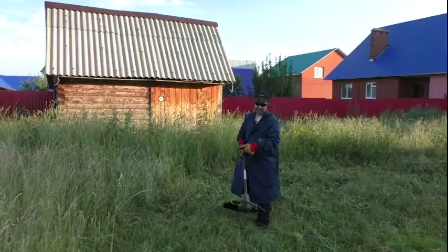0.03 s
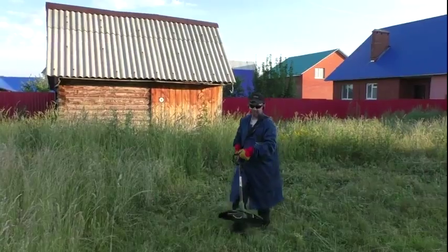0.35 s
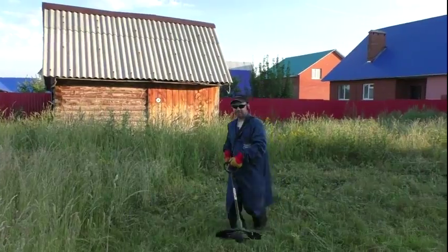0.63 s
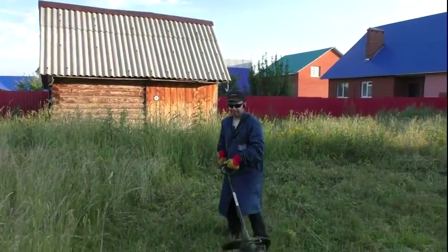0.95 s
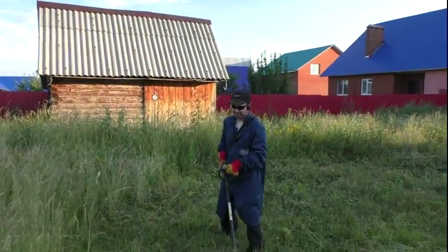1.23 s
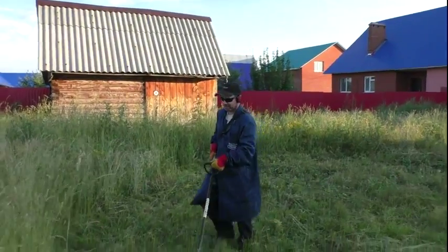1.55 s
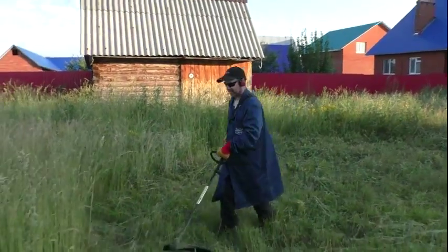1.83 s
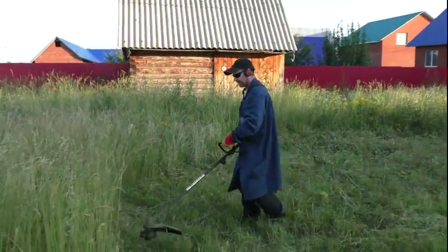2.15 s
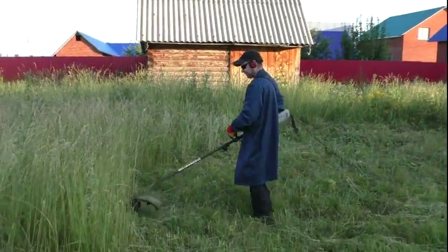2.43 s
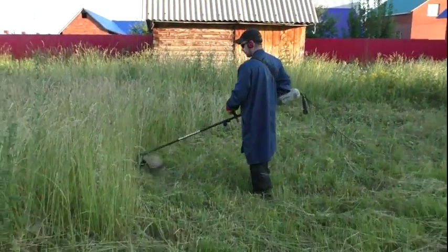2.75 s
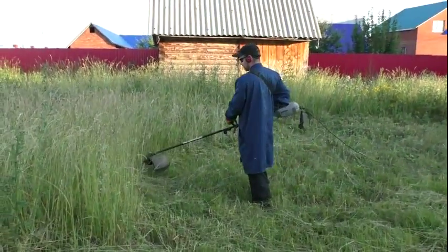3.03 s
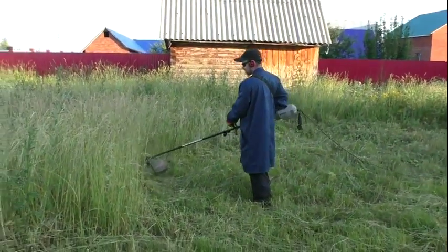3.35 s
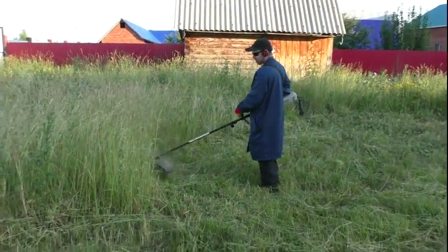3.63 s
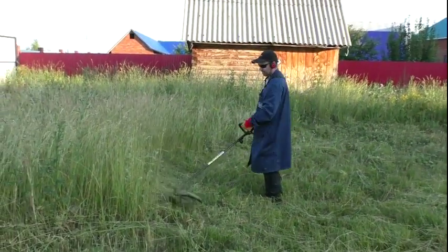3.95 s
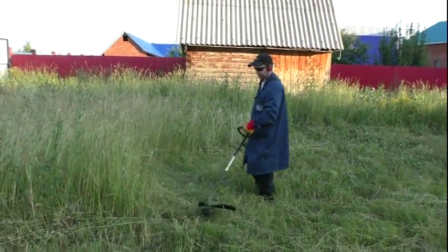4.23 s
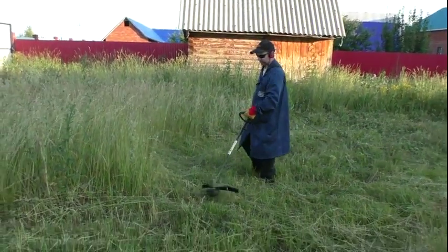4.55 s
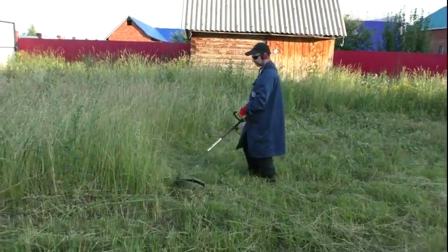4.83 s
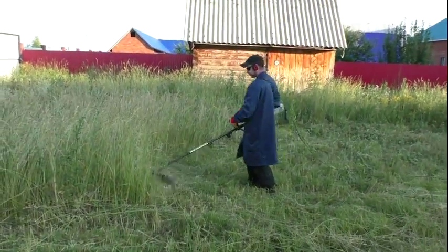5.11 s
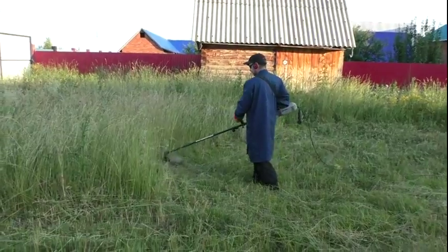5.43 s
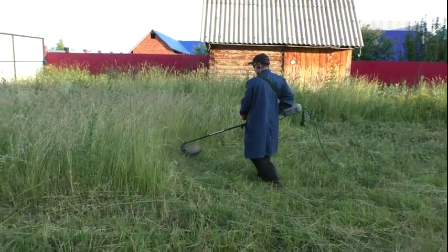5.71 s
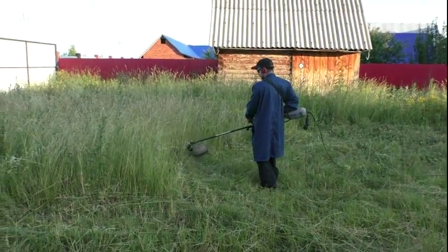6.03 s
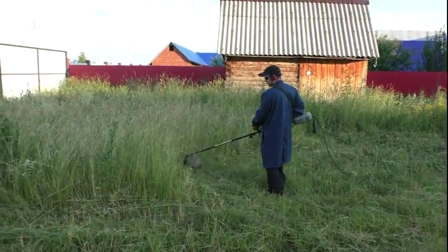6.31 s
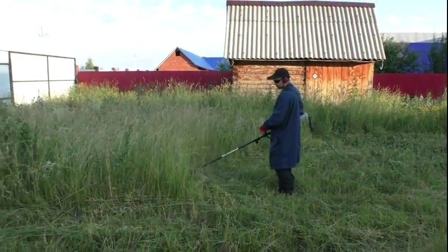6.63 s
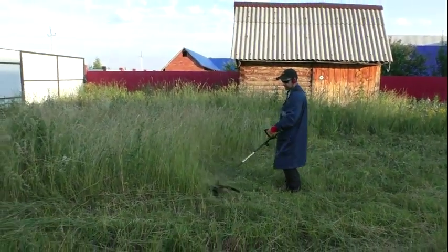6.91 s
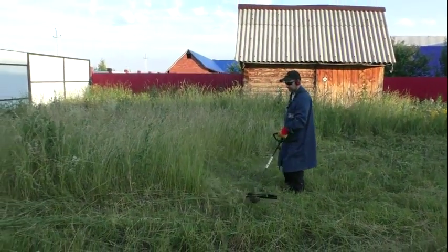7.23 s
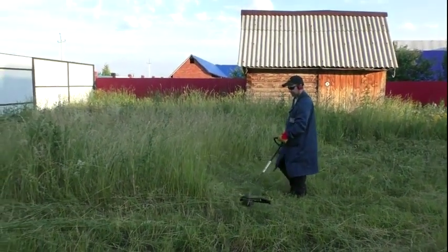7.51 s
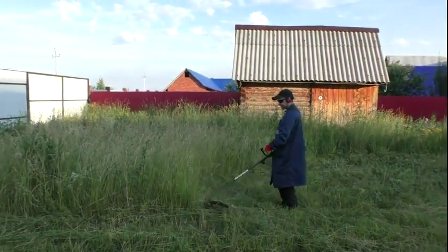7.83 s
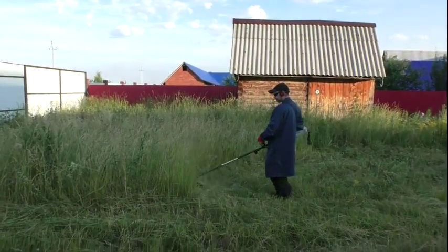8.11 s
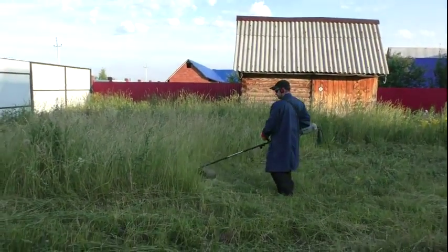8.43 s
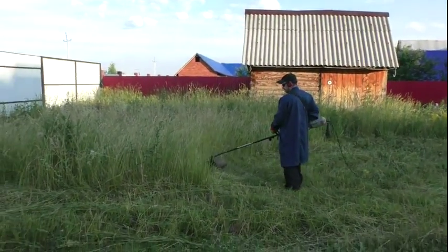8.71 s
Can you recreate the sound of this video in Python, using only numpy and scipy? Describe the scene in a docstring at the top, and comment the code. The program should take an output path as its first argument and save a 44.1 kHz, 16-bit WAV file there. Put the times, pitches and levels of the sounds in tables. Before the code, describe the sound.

In an open yard, a soft footstep rustles, then an electric string trimmer spins up nearby with a rising whine and a metallic rattle. Its lines hum and swish through tall grass, the pitch sinking as the motor takes the load and climbing again between sweeps. Stalks shred and thump on the guard, hard stems snap sharply, and occasional knocks ring the shaft over a faint outdoor murmur.

```python
"""A rising whine and swish: an electric string trimmer spins up and sweeps through tall grass nearby.
Its two lines hum and whip the air, the drive whistles, and all sink in pitch as grass loads the motor.
Stalks shred and thump on the guard, hard stems snap, the loose head rattles and knocks ring the
metal shaft. Underneath are one soft footstep at the start and the murmur of an open yard."""
import sys
import numpy as np
from scipy import signal
from scipy.fft import rfft, irfft, next_fast_len
from scipy.io import wavfile
from scipy.ndimage import map_coordinates

SR = 44100
rng = np.random.default_rng(int(sys.argv[2]) if len(sys.argv) > 2 else 0)


def output_pcm(signal):
    """Save a mono or channel-first signal as 16-bit PCM at the path in sys.argv[1].

    Samples are clipped to [-1, 1] before scaling.
    """
    pcm = np.clip(np.atleast_2d(signal).T, -1, 1) * 32767
    wavfile.write(sys.argv[1], SR, np.round(pcm).astype(np.int16))


N = 391166
T = np.arange(N) / SR
SWING_OUT_S = (0.75, 1.06)  # the lines swing out over this span
WHINE_DB_PER_OCTAVE = 30  # gain as the speed doubles
# colour of tearing stalks: freq_hz, level_db
SHRED = [(300, 2), (900, -6), (2000, 6), (4000, 1.5), (8500, 0), (11200, 4.5), (13000, 0), (16000, -5)]


def drive_whine(octaves, passes, near_db):
    """The drive whistles: side tones crowd in at speed, and the octave stands out under load."""
    # the main whistle: pass_multiple, level_db
    main_tone = [(10, 0)]
    # its fader: time_s, level_db
    fader = [(1.1, -50.5), (1.42, -29), (1.58, -42.5), (1.72, -32), (2.0, -31.5), (2.55, -47.5),
             (3.25, -42), (3.65, -40), (4.05, -55), (4.18, -39.5), (4.55, -36.5), (4.77, -63),
             (4.95, -38.5), (5.3, -56.5), (5.9, -44), (6.47, -41), (7.03, -56), (7.22, -42), (7.88, -39),
             (8.2, -53)]
    # its side tones: pass_multiple, level_db
    side_tones = [(9.5, 0), (10.5, -4.5), (11, 0.5)]
    shaken = passes + 0.0084 * wobble(60)  # the whipping lines shake the drive and blur its pitch
    whistle = amp(curve(fader)) * partials(main_tone, shaken)
    whine = amp(-45 + WHINE_DB_PER_OCTAVE * octaves + near_db) * partials(side_tones, shaken)
    labour = amp(-54.5) * partials(main_tone, 2 * shaken)
    return ramp(SWING_OUT_S) * (whistle + filtered(whine + labour, shaft_resonance))


def line_hum(octaves, passes):
    """The lines push air on each pass; unequal lengths add in-between tones until they wear even."""
    # harmonics of the pushed air: pass_multiple, level_db
    harmonics = [(1, 0.5), (2, -14), (3, -12.5), (5, -19.5)]
    # tones of unequal lines: pass_multiple, level_db
    lopsided = [(.5, -15), (1.5, -5), (2.5, -19), (4.5, -15)]
    # those tones fade with wear: time_s, gain_db
    wear = [(2.4, 1), (3.5, -8.5)]
    # slow drift of the hum: time_s, gain_db
    drift = [(2.35, -6.5), (2.6, -6), (2.9, 0.5), (4.15, -2.5), (4.5, -0.5), (5.3, -6.5), (5.9, 2),
             (6.65, 5.5), (7.1, -3.5), (7.9, 9.5), (8.15, -15), (8.5, 0)]
    even = partials(harmonics, passes, flutter_db=1.84, flutter_hz=13)
    uneven = amp(curve(wear)) * partials(lopsided, passes, flutter_db=1.84, flutter_hz=13)
    return ramp(SWING_OUT_S) * amp(-35.5 + 24 * octaves + curve(drift)) * (even + uneven)


def line_swish(octaves, passes, near_db):
    """Swish, rasp and the whistle's overtones ring the metal shaft, throbbing with every pass."""
    # body of the swish: pass_multiple, width_multiples, level_db
    body_bands = [(10.2, 1.6, -4.5), (20.23, 1.6, -1.5), (30.23, 1.4, 1.5)]
    # its shrill top: pass_multiple, width_multiples, level_db
    shrill_bands = [(40.1, 1.1, 0), (50, 2.5, -8), (70, 2, -10)]
    # fader of that top: time_s, level_db
    shrill_fader = [(1.6, -44), (2.1, -40), (2.85, -41), (3.22, -36), (3.5, -45.5), (4.05, -45),
                    (4.85, -39.5), (5.05, -53), (5.52, -41.5), (6.53, -41), (6.9, -56), (7.4, -36),
                    (7.75, -50), (8.75, -38)]
    # rasp of the lines: pass_multiple, width_multiples, level_db
    rasp_band = [(18.9, 1.4, 0)]
    # the lines run free of the grass and rasp: start_s, length_s, level_db
    free_runs = [(1.693, 0.56, -38), (4.383, 0.48, -39.5), (6.119, 0.13, -42), (7.5, .37, -43)]
    third_harmonic = partials([(30, -11)], passes)
    body = eddies(body_bands, passes, flare_db=0.96) + third_harmonic
    body *= amp(-37.5 + 6.5 * octaves + near_db + wobble(22))
    fourth_harmonic = amp(WHINE_DB_PER_OCTAVE * octaves) * partials([(40, -7)], passes)
    shrill = eddies(shrill_bands, passes, flare_db=0) + fourth_harmonic
    shrill *= amp(curve(shrill_fader) + 2.04 * wobble(30))
    free = sum(amp(db) * burst(start, length) for start, length, db in free_runs)
    rasp = free * eddies(rasp_band, passes, flare_db=2.5)
    throb = unit(1 + 0.061 * np.cos(2 * np.pi * passes))
    return ramp(SWING_OUT_S) * throb * filtered(ground_bounce(body) + rasp + shrill, shaft_resonance)


def air_rush(octaves, near_db, switch_on_s=(0.45, 1.03)):
    """A broad rush of air fades in with the motor and grows with its speed."""
    # colour of rushing air: freq_hz, level_db
    colour = [(300, -13.5), (780, -22.5), (1100, -3.5), (2100, -3), (3000, -0.5), (4500, -4.5),
              (10000, -12), (16000, -70)]
    return ramp(switch_on_s) ** 2 * amp(-33.5 + 8 * octaves + near_db + wobble(14)) * noise(colour)


def grass_cut(octaves, passes):
    """Each pass tears stalks with a crackle, and clumps thump on the guard."""
    # the lines bite into a tuft: start_s, length_s, shred_db, thump_db
    bites = [(2.396, 0.049, -31, -36.5), (2.639, 0.37, -38, -38.5), (3.267, 0.12, -33, -34),
             (3.454, 0.36, -35.5, -39.5), (3.839, 0.079, -30.5, -38.5), (4.768, 0.064, -37, -35.5),
             (4.89, 0.18, -29.5, -34), (5.621, 0.13, -34.5, -37.5), (5.94, 0.28, -36.5, -38.5),
             (6.152, 0.13, -33, -33.5), (6.373, 0.55, -32, -39), (6.995, 0.39, -37, -41),
             (7.73, 0.31, -29.5, -37), (8.405, 0.23, -35, -41)]
    # colour of a clump on the guard: freq_hz, level_db
    thump_colour = [(70, -29), (120, -3), (200, 5), (300, -1), (450, -11.5), (2000, -41)]
    skim = ramp(SWING_OUT_S) * amp(3 * octaves)  # between bites the lines only skim the stubble
    shred_gain, thump_gain = skim * amp(-34), skim * amp(-49.5)
    for start, length, shred_db, thump_db in bites:
        bite = burst(start, length)
        shred_gain = np.hypot(shred_gain, amp(shred_db) * bite)
        thump_gain = np.hypot(thump_gain, amp(thump_db) * bite)
    strike = (1 + np.cos(2 * np.pi * passes)) ** 2
    clumps = unit(amp(1.65 * wobble(110) + 1.17 * wobble(24)))
    tearing = unit(noise(SHRED) + grains(750 * strike, spread_db=6.5, spectrum=SHRED))
    thumps = grains(110 * strike, spread_db=0, spectrum=thump_colour)
    return shred_gain * clumps * tearing + thump_gain * thumps


def stem_snaps(splinter_t60_s=0.008, splinter_gain=0.17):
    """A hard stem breaks with one sharp crack and a spray of splinters; thin stems snap brighter."""
    # stems hit by the line: time_s, level_db, thinness (0-1)
    stems = [(1.637, -17, 0.9), (3.0112, -13.5, 1), (3.823, -9, 0.13), (3.9348, -7.5, 0.9),
             (4.007, -15, 0.99), (4.919, -10.5, 0.6), (6.858, -11, 0.78), (8.1222, -10.5, .1),
             (8.5695, -10, 0), (8.6565, -7.5, 0)]
    # colour of a breaking stem: freq_hz, level_db
    colour = [(150, -1), (900, -5.5), (2500, 6.5), (5500, -4), (11000, 1.5), (16000, -8)]
    out, thick_pulse = np.zeros(N), impulse(colour)
    t = np.arange(len(thick_pulse)) / SR
    for start, db, thinness in stems:
        pulse = signal.lfilter([1, -np.clip(thinness, 0, 1)], 1, thick_pulse)
        spray = rng.standard_normal(len(t)) * amp(-60 * t / splinter_t60_s)
        crack = pulse + splinter_gain * np.convolve(spray, pulse)[:len(t)]
        add(out, start, amp(db + 8) * crack / np.abs(crack).max())
    return out


def shaft_and_head(rattle_blows=42, scatter_db=3):
    """Hard knocks and spells of light, uneven rattling ring the metal shaft and the loose head."""
    # knocks on the shaft: time_s, level_db
    knocks = [(0.413, -36), (1.208, -27), (1.2878, -19), (1.483, -18.5), (1.5671, -19.5), (1.5938, -18),
              (4.2136, -17.5), (7.0586, -17.5), (7.199, -17.5), (8.1367, -15), (8.167, -22)]
    # the head chatters as it gathers speed: time_s, level_db
    chatter = [(1.1251, -16.5), (1.2047, -10), (1.3916, -15.5), (1.4808, -16), (1.6086, -11)]
    # it rattles as it speeds up: start_s, length_s, shaft_db, head_db
    rattles = [(1.095, .55, -31.5, -26.5), (7.104, .6, -28, -31)]
    # modes of the shaft: pitch_hz, level_db, t60_s
    shaft_modes = [(2074, -2, 0.08), (3025, -0.5, 0.22), (4210, -5.5, 0.07)]
    # modes of the head: pitch_hz, level_db, t60_s
    head_modes = [(7490, -3, 0.026), (9260, 0, 0.028), (10660, -1, 0.024), (13300, -1, 0.016)]
    on_shaft, on_head = list(knocks), list(chatter)
    for start, length, shaft_db, head_db in rattles:
        times = start + length * (np.arange(rattle_blows) + rng.random(rattle_blows)) / rattle_blows
        on_shaft += zip(times, shaft_db + scatter_db * rng.standard_normal(rattle_blows))
        on_head += zip(times, head_db + scatter_db * rng.standard_normal(rattle_blows))
    shaft = ringing(on_shaft, shaft_modes, gain_db=-2.5, attack_s=0.0026, blur_hz=24)
    head = ringing(on_head, head_modes, gain_db=-6.5, attack_s=0.00052, blur_hz=250)
    return shaft + head


def guard_clack():
    """The plastic guard hits something solid with a short clack."""
    # the hit: time_s, level_db
    bump = [(8.136, -20)]
    # modes of the clack: pitch_hz, level_db, t60_s
    modes = [(1250, 1, 0.02), (1480, 4, 0.023)]
    return ringing(bump, modes, gain_db=3, attack_s=0.0008, blur_hz=69.9)


def slack_scrape(passes):
    """The slack lines scrape once a pass, harder and harder, until they fly straight."""
    # fader of the scrape: time_s, level_db
    fader = [(0.55, -70), (0.8, -40.5), (1.25, -34), (1.9, -70)]
    # its colour: freq_hz, level_db
    colour = [(900, -10), (1750, 1), (3000, -9), (12000, -32)]
    strokes = unit((1 + np.cos(2 * np.pi * passes)) ** 2 + 1)
    return amp(curve(fader)) * strokes * noise(colour)


def footstep(start_s=0.28, length_s=0.22, level_db=-51.5):
    """Stalks rustle softly under a boot."""
    rustle = unit(noise(SHRED) + grains(480, spread_db=18, spectrum=SHRED))
    return amp(level_db) * burst(start_s, length_s) * rustle


def yard(level_db=-43):
    """A steady bed of open air murmuring around the houses."""
    # colour of the murmur: freq_hz, level_db
    colour = [(30, -39), (108, -4), (150, -11), (804, -21), (1500, -15), (3070, -28.5), (6300, -43),
              (12000, -37.5)]
    return amp(level_db) * noise(colour)


def shaft_resonance(hz, radiate_hz=950):
    """Response of the direct sound plus the ringing of the metal shaft; the head is too small to radiate lows."""
    # resonances of the metal shaft, rung by the whine: centre_hz, width_hz, level_db
    resonances = [(1944.6, 270, 2.5), (2530, 320, -1), (2993, 63, 3), (4247, 279, 1.5), (5727, 240, 1)]
    power = sum((2 * amp(db)) ** 2 / (1 + (2 * (hz - centre) / width) ** 2)
                for centre, width, db in resonances)
    return np.sqrt(1 + power) * hz ** 4 / np.hypot(hz ** 4, radiate_hz ** 4)


def ground_bounce(x, bounce=0.24):
    """The ground returns a copy whose delay shifts as the head bobs, so the bands trade strength."""
    delay_s = 0.000733 * amp(2.02 * wobble(2.5))
    return (x + bounce * np.interp(T - delay_s, T, x)) / np.hypot(1, bounce)


def stereo_scatter(x, t60_s=0.15):
    """Scatter from the ground, fence and shed differs between left and right."""
    # stereo width: freq_hz, side_over_mid_db
    width = [(200, -16.5), (600, -10.5), (4000, -13.5), (8000, -45), (12500, -12)]
    # balance: freq_hz, left_over_right_db
    lean = [(90, 4), (500, -0.5), (2000, 0.33)]
    t = np.arange(SR // 5) / SR
    scatter = rng.standard_normal(len(t)) * amp(-60 * t / t60_s)
    side = signal.oaconvolve(x, scatter / np.linalg.norm(scatter))[:N]
    side = filtered(side, lambda hz: amp(along(width, hz)))
    stereo = np.array([x + side, x - side])
    return filtered(stereo, lambda hz: amp(np.outer([.5, -.5], along(lean, hz))))


def partials(table, passes, flutter_db=3, flutter_hz=30):
    """Tones locked to whole multiples of the head's turn, each wavering in strength."""
    tone = lambda k: np.sqrt(2) * np.sin(2 * np.pi * (round(2 * k) / 2 * passes + rng.random()))
    return sum(amp(db + flutter_db * wobble(flutter_hz)) * tone(k) for k, db in table)


def eddies(bands, passes, flare_db, steps_per_pass=256, turn_likeness=0.62):
    """Noise bands glide with the head's speed; partly repeating each turn splits them into fine tones."""
    length = next_fast_len(N, real=True)
    multiple = np.fft.rfftfreq(length, 1 / steps_per_pass)
    comb = 1 / (1 - turn_likeness * np.exp(-2j * np.pi * 2 * multiple))
    out = np.zeros(N)
    for centre, width, db in bands:
        by_angle = irfft(rfft(rng.standard_normal(length)) * comb / (1 + ((multiple - centre) / width) ** 2))
        by_time = map_coordinates(by_angle, [passes * steps_per_pass], order=1)
        out += amp(db + flare_db * wobble(7.6)) * by_time
    return unit(out)


def ringing(blows, modes, gain_db, attack_s, blur_hz):
    """Every blow rings the modes at new strengths; buzzing loose parts blur their pitch."""
    out, t = np.zeros(N), np.arange(SR // 3) / SR
    for start, db in blows:
        ring = np.zeros(len(t))
        for hz, mode_db, t60 in modes:
            decay = amp(mode_db + rng.normal(0, 1.7) - 60 * t / t60)
            drift = np.cumsum(rng.standard_normal(len(t))) * np.sqrt(2 * np.pi * blur_hz / SR)
            ring += decay * np.sin(2 * np.pi * (hz * t + rng.random()) + drift)
        add(out, start, amp(db + gain_db) * ring * (1 - np.exp(-t / attack_s)))
    return out


def grains(per_second, spread_db, spectrum):
    """Random impacts, their sizes scattered by spread_db, at rms 1."""
    sizes = rng.choice([-1, 1], N) * amp(spread_db * np.clip(rng.standard_normal(N), -2, 2))
    hits = sizes * (rng.random(N) < per_second / SR)
    return unit(signal.oaconvolve(hits, impulse(spectrum))[:N])


def impulse(spectrum, size=2048):
    """The causal pulse that has this spectrum, with peak 1."""
    cepstrum = irfft(np.log(amp(along(spectrum, np.fft.rfftfreq(size, 1 / SR)))))
    cepstrum[1:size // 2] *= 2
    cepstrum[size // 2 + 1:] = 0
    pulse = irfft(np.exp(rfft(cepstrum)))
    return pulse / np.abs(pulse).max()


def noise(spectrum):
    """Coloured noise of rms 1."""
    return unit(filtered(rng.standard_normal(N), lambda hz: amp(along(spectrum, hz))))


def filtered(x, response):
    """x shaped by a gain for each frequency."""
    size = next_fast_len(N + SR // 4)
    return irfft(rfft(x, size) * response(np.fft.rfftfreq(size, 1 / SR)), size)[..., :N]


def wobble(rate_hz):
    """A smooth random curve, rate_hz knots a second."""
    knots = rng.standard_normal(int(N * rate_hz / SR) + 4)
    coarse = T[::32]
    return np.interp(T, coarse, map_coordinates(knots, [coarse * rate_hz]))


def burst(start, length, attack_s=0.019, release_s=0.086):
    """Quick attack, hold, and a release that dies away."""
    return np.clip((T - start) / attack_s, 0, 1) * np.exp(-np.maximum(T - start - length, 0) / release_s)


def ramp(span_s):
    """Fade from 0 to 1 over the span."""
    return np.interp(T, span_s, [0, 1])


def curve(points):
    """(time_s, value) points read at every sample."""
    return np.interp(T, *np.transpose(points))


def along(points, hz):
    """(freq_hz, value) points read on a log axis."""
    freqs, values = np.transpose(points)
    return np.interp(np.log(hz + 1), np.log(freqs + 1), values)


def add(track, start_s, sound):
    """Mix a sound into the track."""
    room = track[max(round(start_s * SR), 0):][:len(sound)]
    room += sound[:len(room)]


def amp(db):
    """Decibels to gain."""
    return 10 ** (np.asarray(db) / 20)


def unit(x):
    """Scaled to rms 1."""
    return x / np.sqrt(np.mean(x ** 2) + 1e-20)


def scene(full_speed_hz=144):
    """The head's speed and swing steer the trimmer; its hits, a footstep and the yard join the mix."""
    # speed, two line passes to each turn of the head: time_s, pass_rate_hz
    speed = [(0.75, 38.8), (1.05, 59.67), (1.26, 90.75), (1.55, 123.2), (1.88, 138.7), (2.36, 143.9),
             (2.65, 133.9), (2.98, 124.1), (3.27, 136.2), (3.5, 120.8), (4.05, 92.1), (4.15, 107.9),
             (4.44, 134), (4.78, 145), (4.97, 133.8), (5.13, 103.7), (5.27, 97.1), (5.5, 102.4),
             (5.72, 99.8), (5.95, 116.1), (6.15, 125.2), (6.39, 115), (7.0, 88.3), (7.23, 111.6),
             (7.48, 127.6), (7.8, 130.6), (8.12, 97.97), (8.59, 94.65), (8.85, 114)]
    # the head swings toward the listener and away into the grass: time_s, nearness_db
    swing = [(1.3, 6.5), (1.6, 5.5), (2.2, -1), (3.25, 1.5), (3.75, -3), (4.5, 2.5), (5.25, -6.5),
             (6.15, 5), (6.7, -2), (7.2, 5.5), (8.3, -3.5)]
    pass_hz, near_db = curve(speed), curve(swing)
    octaves = np.log2(pass_hz / full_speed_hz)
    passes = np.cumsum(pass_hz * (1 + 0.001504 * wobble(16))) / SR  # running count of line passes
    tones = line_hum(octaves, passes) + drive_whine(octaves, passes, near_db)
    air = line_swish(octaves, passes, near_db) + air_rush(octaves, near_db)
    cutting = grass_cut(octaves, passes) + stem_snaps()
    clatter = shaft_and_head() + guard_clack() + slack_scrape(passes)
    return stereo_scatter(tones + air + cutting + clatter + footstep() + yard())


def record(dry, low_cut_hz=48, top_hz=15950):
    """Thin the deep bass and cut off the very top."""
    return filtered(dry, lambda hz: hz ** 2 / np.hypot(hz ** 2, low_cut_hz ** 2) * (hz < top_hz))


dry = scene()
out = record(dry)
output_pcm(out)
```